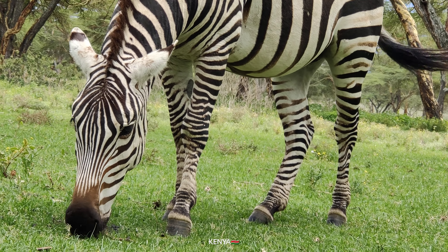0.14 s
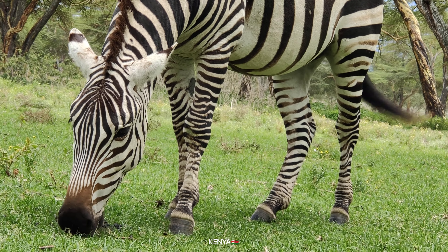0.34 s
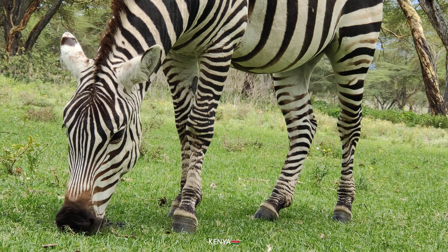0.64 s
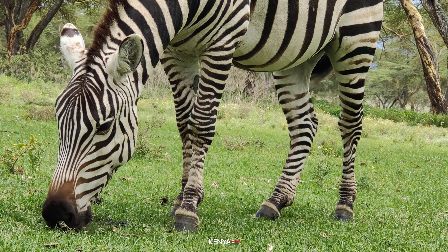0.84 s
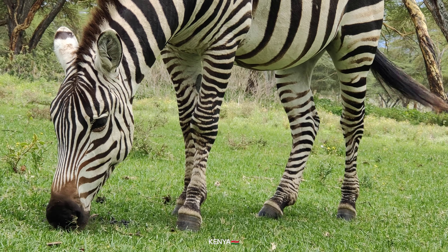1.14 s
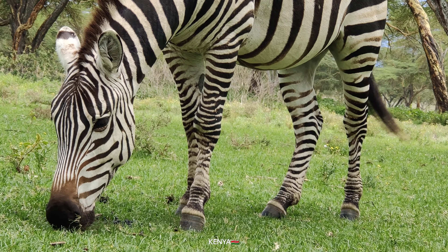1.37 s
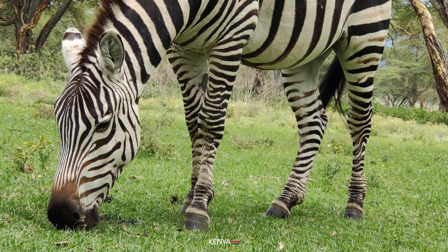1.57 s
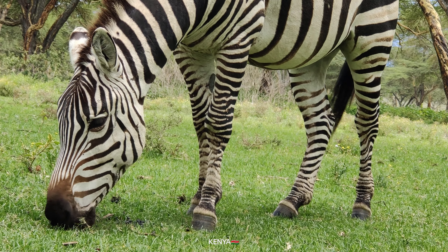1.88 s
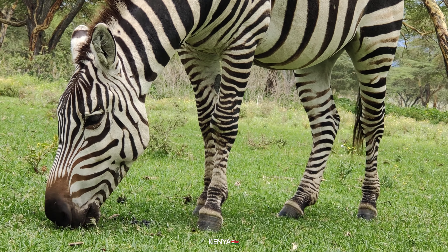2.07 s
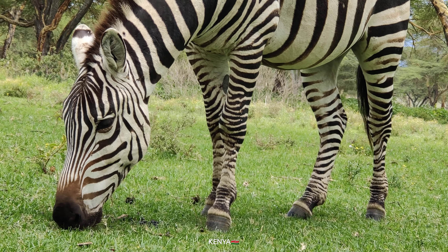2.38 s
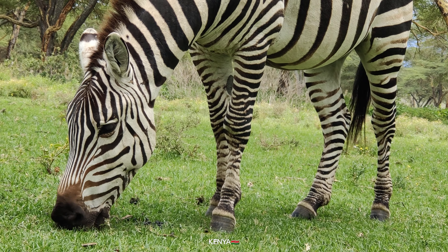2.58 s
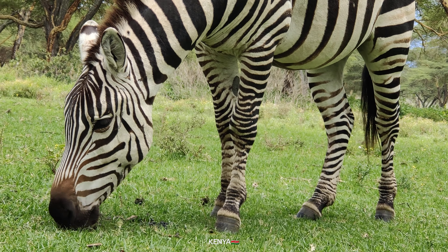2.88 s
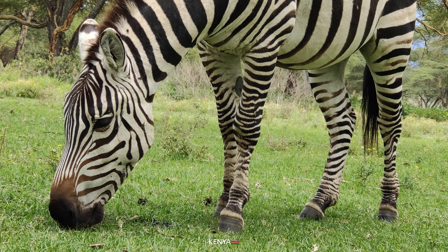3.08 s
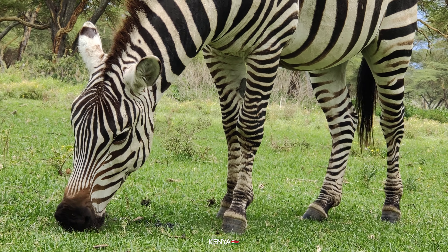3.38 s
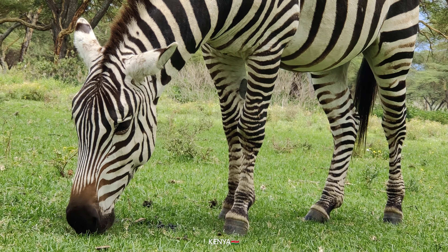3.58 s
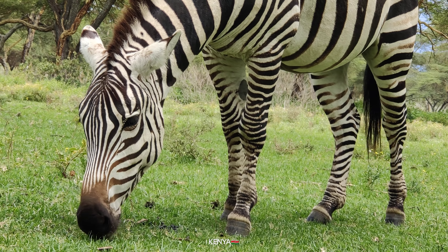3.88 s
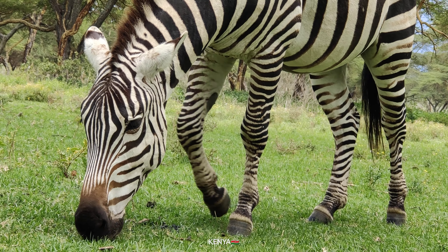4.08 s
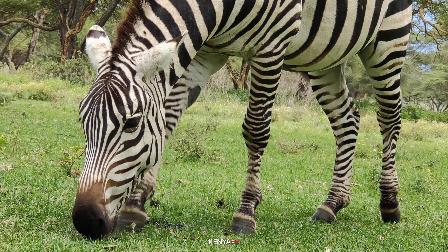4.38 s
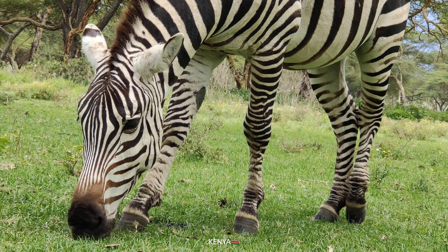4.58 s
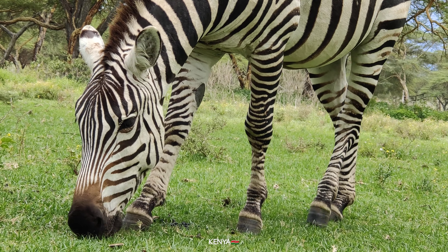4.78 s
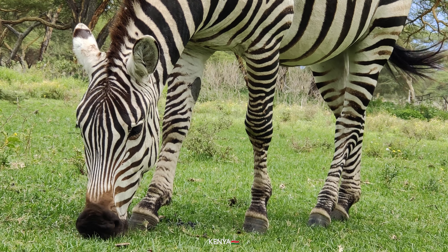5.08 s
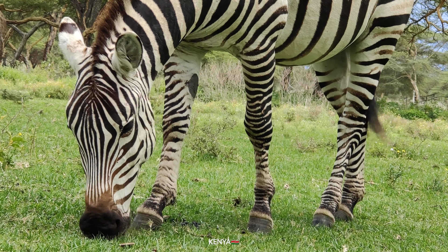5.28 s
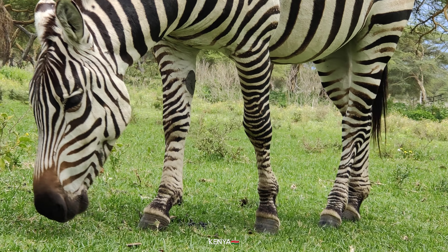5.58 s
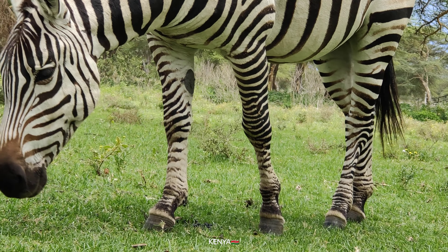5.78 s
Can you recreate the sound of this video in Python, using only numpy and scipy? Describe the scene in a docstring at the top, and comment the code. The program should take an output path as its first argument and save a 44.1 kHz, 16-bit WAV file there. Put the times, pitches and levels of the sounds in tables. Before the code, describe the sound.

Open grassland, heard in stereo from a few metres away, with a soft distant low rumble and faint smooth hiss throughout. During the first 1.3 seconds a light breeze buffets the left side in slow uneven puffs, while a low bird coos and small birds give thin, quick gliding whistles, fairly busy until about 1.7 seconds. A grazing zebra makes a short crackling snap with a turf thump at 0.8. Quiet hollow jaw knocks come at 1.3, 1.9 and 2.4, with a soft dull thud at 2.0. A deeper thud at 2.8 leads into a strong, sharp tearing burst at 2.9, crisp and scraping, with a low thump. A smaller snap follows at 3.5, then faint knocks and ticks around 4.1 to 4.5 amid scattered chirps. At about 5.4 comes the loudest rip, a dense crackle with a hard snap and thump, then calm with a few faint chirps.

```python
"""A zebra crops short grass a few metres away: pulls crackle, stalks snap and the turf thumps.
Snaps and knocks are short pushes or ticks that ring the mouth; thuds are low tones that die away.
Small birds whistle (gliding sine tones) and a low call coos, over a distant rumble and faint hiss (shaped noise).
At first a light breeze buffets mainly the left microphone port with slow, uneven pressure swings."""
import sys
import numpy as np
from scipy import signal
from scipy.fft import rfft, irfft
from scipy.io import wavfile

SR = 44100
rng = np.random.default_rng(int(sys.argv[2]) if len(sys.argv) > 2 else 0)


def put_to_file(sound):
    """Save the sound as 16-bit audio at rate SR, in the file named by the first command-line argument."""
    columns = np.atleast_2d(sound).T  # one column per channel
    safe = np.clip(columns, -1, 1)
    whole_steps = np.round(safe * 32767)
    wavfile.write(sys.argv[1], SR, whole_steps.astype(np.int16))


N = 261811


def undb(db):
    """Turn decibels into a gain."""
    return 10 ** (np.asarray(db) / 20)


def unit(x):
    """Scale a sound to rms 1."""
    return x / np.sqrt(np.mean(x ** 2) + 1e-20)


def clock(seconds):
    """Sample times of a short sound, in seconds."""
    return np.arange(max(int(seconds * SR), 8)) / SR


def add(track, start_s, sound):
    """Mix a sound into a track, dropping whatever falls outside it."""
    at = np.arange(len(sound)) + int(start_s * SR)
    inside = (at >= 0) & (at < N)
    track[at[inside]] += sound[inside]


def band(x, lo_hz, hi_hz, order=2):
    """Keep only the frequencies between two edges."""
    edges = [lo_hz, min(hi_hz, .45 * SR)]
    return signal.sosfilt(signal.butter(order, edges, "band", fs=SR, output="sos"), x)


def walk(rate):
    """Slow random drift with a spread near 1, with this many new values a second."""
    knots = rng.standard_normal(int(N / SR * rate) + 2)
    return np.interp(np.arange(N) / SR * rate, np.arange(len(knots)), knots)


def ring(modes, detune=1, phase=0):
    """One blow sets off several tones, each falling by 60 dB in its own time t60."""
    t = clock(.2)
    sound = np.zeros(len(t))
    for hz, t60, db in modes:
        decay = np.exp(-np.log(1000) * t / t60)
        sound += undb(db) * np.sin(2 * np.pi * hz * detune * t + phase) * decay
    return sound


def ports(x, lag_ms, pan_db=0):
    """Two microphone ports: a positive lag reaches the right one later, a positive pan favours the left."""
    late = np.interp(np.arange(N) - lag_ms * SR / 1000, np.arange(N), x, left=0)
    return np.array([x * undb(pan_db / 2), late * undb(-pan_db / 2)])


def scatter(x, t60, damp_hz):
    """Diffuse return from ground and bushes: a fading noise tail, different at each port."""
    t = clock(.6)
    noise = band(rng.standard_normal((2, len(t))), 210, damp_hz, order=1)
    tails = noise * np.exp(-np.log(1000) * t / t60)
    return np.array([signal.fftconvolve(x, tail / np.linalg.norm(tail))[:N] for tail in tails])


def air(level_db=-52.8, rumble_pan_db=2):
    """Open-air background: distant rumble, much alike at both ports, under a smooth faint hiss."""
    # noise spectrum: f/Hz, relative level/dB (per Hz)
    air_spectrum = [(12, -33), (20, -7), (33, -4.5), (49, -1.5), (76, -1.5), (169, -15), (387, -29),
                    (796, -33.5), (889, -36), (1510, -38.5), (1830, -41.5), (3270, -41.5), (3550, -43.5),
                    (6180, -47.5), (12000, -47.5), (15000, -49)]
    # how alike the two ports are: f/Hz, likeness (0 unrelated, 1 the same)
    port_likeness = [(60, 0.7), (130, 0.6), (290, 0.22), (640, 0.22), (1400, 0.37), (15000, 0.0062)]
    log_hz = np.log(np.maximum(np.arange(N // 2 + 1) * SR / N, 1))
    spectrum_hz, spectrum_db = np.transpose(air_spectrum)
    likeness_hz, likeness = np.transpose(port_likeness)
    gain = undb(np.interp(log_hz, np.log(spectrum_hz), spectrum_db))
    alike = np.clip(np.interp(log_hz, np.log(likeness_hz), likeness), 0, 1)
    # nothing below 15 Hz
    mid, side = rfft(rng.standard_normal((2, N))) * gain * (log_hz > np.log(15))
    left_right = np.array([[1], [-1]])
    both = np.sqrt(1 + alike) * mid + np.sqrt(1 - alike) * side * left_right
    # only the lows waver; the hiss stays even
    low = 1 / (1 + (np.exp(log_hz) / 700) ** 2)
    waver_db = .3 * walk(1.5) + 1.1 * walk(12)
    rumble = irfft(both * low, N) * undb(waver_db + left_right * rumble_pan_db / 2)
    hiss = irfft(both * (1 - low), N)
    return undb(level_db) * unit(rumble + hiss)


def whistle(length, pitches, depth_hz=0, trill_hz=85, waver=0.006, flutter_db=1.6, swell=.65, unsteady=.3):
    """A nearly pure note swells and fades as its pitch curves, perhaps with an uneven trill."""
    t = clock(length)
    u = t / length
    # a smooth curve through the start, middle and end pitches
    curve = np.polyfit([0, .5, 1], np.log(pitches), 2)
    hz = np.exp(np.polyval(curve, u))
    trill_rate = trill_hz * np.exp(unsteady * walk(60)[:len(t)])
    trill = np.sin(2 * np.pi * np.cumsum(trill_rate) / SR)
    hz = hz * (1 + waver * walk(171)[:len(t)]) + depth_hz * trill
    loudness = np.sin(np.pi * u) ** swell * undb(flutter_db * walk(53)[:len(t)])
    return np.sqrt(2) * loudness * np.sin(2 * np.pi * np.cumsum(hz) / SR)


def birds():
    """Smooth low coos, and thin slurs and trills above them, each a gliding near-pure tone."""
    # a low cooing call: t/s, length/s, start f/Hz, middle f/Hz, end f/Hz, level/dB
    coos = [(-0.09, 0.24, 1210, 1248, 1150, -61), (0.135, 0.06, 1190, 1210, 1200, -79),
            (0.475, 0.165, 1110, 1220, 1000, -67), (0.6, 0.08, 1370, 1335, 1280, -76.5),
            (0.95, 0.15, 1075, 1115, 1095, -76)]
    # songbirds: t/s, length/s, start f/Hz, middle f/Hz, end f/Hz, trill depth/Hz, level/dB
    slurs = [(0.103, 0.035, 5350, 4720, 3800, 0, -72), (0.107, 0.18, 7570, 7270, 6750, -3, -77.5),
             (0.17, 0.044, 2200, 2410, 2650, 150, -78), (0.24, 0.019, 2100, 2390, 2750, -2, -75),
             (0.335, 0.15, 4300, 3350, 2600, 230, -76.5), (0.455, .11, 2650, 2170, 2750, 172, -77),
             (0.547, 0.07, 2810, 3340, 2440, 2, -76), (0.612, 0.052, 5200, 3300, 2400, 0, -71.5),
             (1.076, .11, 2480, 2540, 2680, 44, -78.5), (1.171, .13, 2650, 3170, 4110, 150, -79.5),
             (1.27, 0.05, 3700, 4050, 4150, 160, -75), (1.315, 0.028, 4150, 3450, 2500, 0, -75.5),
             (1.346, 0.041, 2750, 3530, 4180, 0, -75), (1.378, 0.04, 4060, 2900, 3360, 0, -75.5),
             (1.382, 0.034, 4300, 4400, 4700, 0, -80), (1.413, 0.064, 2800, 2660, 2100, 0, -67),
             (1.578, 0.1, 3200, 3220, 3200, 50, -80), (1.625, 0.034, 4430, 5260, 5550, 0, -74),
             (1.659, 0.062, 5600, 4800, 3500, 0, -70.5), (1.712, 0.045, 3700, 2850, 2450, 0, -79),
             (1.947, 0.085, 4100, 3600, 3240, 60, -80), (2.175, 0.18, 3200, 3207, 3300, 110, -81),
             (2.45, 0.069, 5200, 4100, 3220, 0, -80), (2.617, 0.057, 3130, 2880, 2500, 2, -77.5),
             (3.075, 0.05, 3850, 4000, 3500, 0, -79), (3.506, 0.06, 5400, 4250, 3150, 40, -75),
             (3.575, 0.05, 3050, 3200, 3300, 40, -80), (3.85, 0.049, 3740, 3080, 2600, 0, -80),
             (3.971, 0.032, 2580, 3000, 3250, 0, -80), (4.009, 0.024, 3300, 2940, 2500, 0, -75),
             (4.055, 0.031, 3100, 3700, 3500, 248, -73.5), (4.05, .06, 4100, 4350, 4150, 300, -82),
             (4.067, .02, 3270, 2850, 2550, 0, -76), (4.223, 0.024, 2500, 2910, 3400, 0, -77),
             (4.27, 0.023, 4220, 4100, 3970, 0, -80), (4.28, 0.022, 3160, 3250, 2930, 0, -74.5),
             (4.692, .04, 3700, 3180, 2600, 0, -81), (4.714, 0.067, 2900, 2430, 2330, 0, -70.5),
             (4.766, 0.055, 2330, 2240, 1950, 0, -72.5), (4.762, 0.026, 4960, 5200, 4750, 200, -75.5),
             (4.763, 0.045, 4730, 4280, 4100, 100, -78), (4.826, .085, 3700, 3750, 4000, 140, -82),
             (4.903, 0.023, 2970, 3130, 3270, 0, -77), (4.997, 0.042, 2830, 2720, 2530, -2, -73.5),
             (4.934, .05, 3114, 3240, 3180, 120, -75), (5.725, 0.075, 3700, 3350, 2600, 120, -76),
             (5.85, 0.035, 4000, 4250, 4400, 0, -80), (5.905, 0.05, 5950, 5800, 5650, 0, -77)]
    out = np.zeros(N)
    for s, length, *pitches, db in coos:
        add(out, s, undb(db) * whistle(length, pitches, flutter_db=1.8, swell=1.7))
    for s, length, *pitches, depth_hz, db in slurs:
        add(out, s, undb(db) * whistle(length, pitches, depth_hz))
    return out


def breeze(wobble=0.05, rush_db=-17):
    """Eddies roll over a port, each a few uneven slow pressure swings with a little rush."""
    # gusts: t/s, length/s, swirl f/Hz (before its wobble), level/dB (before panning)
    gusts = [(-0.02, 0.17, 35, -39), (0.281, 0.077, 32, -45), (0.642, 0.051, 46.7, -44.5),
             (0.788, 0.052, 40.4, -47), (0.988, 0.093, 33, -42.5), (1.08, 0.067, 56, -35.5),
             (1.203, 0.092, 46.5, -40.5)]
    out = np.zeros(N)
    drift = walk(66.1)
    rush = unit(band(rng.standard_normal(N), 66.0, 103.0))
    for s, length, hz, db in gusts:
        t = clock(length)
        start = int(s * SR)
        swirl_hz = hz * np.exp(wobble * np.roll(drift, -start)[:len(t)])
        swirl = np.sin(2 * np.pi * np.cumsum(swirl_hz) / SR)
        eddy = swirl + undb(rush_db) * np.roll(rush, -start)[:len(t)]
        add(out, s, undb(db) * np.sin(np.pi * t / length) * eddy)
    return out


def ticks(length, fibres_per_s=1400, size_db=3.5):
    """A short swell of quick ticks at random moments and of uneven size, with rms 1."""
    t = clock(length)
    chance = rng.random((2, len(t)))
    happens = chance[0] < fibres_per_s / SR
    sizes = undb(-size_db * np.log(chance[1] + 1e-3))
    # push up on even samples, down on odd ones
    signs = (-1) ** np.arange(len(t))
    return unit(happens * sizes * signs * np.sin(np.pi * t / length) ** .5)


def chews(spread=.03):
    """Teeth grind briefly and ring the closed mouth, whose shape differs a little at each stroke."""
    # hollow knocks of the jaws: t/s, grind length/s, peak level/dB
    jaw_knocks = [(0.107, 0.08, -54), (1.284, 0.062, -48.5), (1.933, 0.02, -52), (2.41, 0.047, -46.5),
                  (4.08, 0.044, -54.5)]
    # tones of the closed mouth: f/Hz (before its random shift), t60/s, relative level/dB
    jaw_modes = [(330, 0.08, 5), (420, 0.02, 1), (630, 0.018, -6), (968, 0.03, -3)]
    out = np.zeros(N)
    for s, length, db in jaw_knocks:
        t = clock(length)
        grind = ticks(length) * np.sin(np.pi * t / length)
        mouth = ring(jaw_modes, detune=np.exp(spread * rng.standard_normal()))
        knock = signal.fftconvolve(grind, mouth)
        add(out, s, undb(db) * knock / np.abs(knock).max())
    return out


def crack(low_hz, spread=0.025, release_ms=1.12, release_power=0.3):
    """A sudden release of tension, heard directly and through a slightly varying mouth; peak 1."""
    # tones of mouth and sod: f/Hz (before its random shift), t60/s, level/dB (against the bare crack)
    mouth_modes = [(393, 0.035, -40), (470, 0.018, -39), (657, 0.04, -45), (727, 0.05, -52),
                   (1060, 0.02, -50), (1207, 0.019, -46), (1459, 0.04, -41), (1700, 0.012, -37)]
    shifts = np.exp(spread * rng.standard_normal(len(mouth_modes)))
    modes = [(hz * shift, t60, db) for (hz, t60, db), shift in zip(mouth_modes, shifts)]
    mouth = ring(modes, phase=np.pi / 2)
    # release_ms holds for a low edge of 200 Hz; thinner stalks, with higher edges, let go faster
    release_s = release_ms / 1000 * (low_hz / 200) ** -release_power
    t = np.arange(len(mouth)) / SR
    push = np.sin(np.pi * np.minimum(t / release_s, 1)) ** 2
    through_mouth = signal.fftconvolve(push, mouth)[:len(mouth)]
    sound = band(push + through_mouth, low_hz, 6000, order=1)
    return sound / np.abs(sound).max()


def blades(count):
    """Short ring of a dry blade parting, with unit energy, in this many samples."""
    # crisp tones of breaking blades: f/Hz, t60/s, relative level/dB
    blade_modes = [(2770, 0.0047, 4), (3480, 0.0027, -6), (5660, 0.0026, 5), (8000, 0.00072, 11.5)]
    tick = band(ring(blade_modes), 2400, 8500, order=4)[:count]
    return tick / np.linalg.norm(tick)


def snap(snap_db, turf_db, low_hz, turf_hz=141, turf_t60=0.073, turf_rise=0.006, crisp_db=-21,
         splinter_s=0.0045):
    """Grass lets go: a crack rings the mouth, fibres splinter, and the released turf springs back."""
    t = clock(.2)
    # cubing the noise leaves a few strong spikes
    fibres = rng.standard_normal(len(t)) ** 3 * np.exp(-t / splinter_s)
    splinters = np.convolve(fibres, blades(count=512))[:len(t)]
    sound = crack(low_hz) + undb(crisp_db) * splinters / np.abs(splinters).max()
    turf = ring([(turf_hz, turf_t60, turf_db)], phase=np.pi / 4)
    turf = turf * (1 - np.exp(-t / turf_rise))
    return -undb(snap_db) * sound - turf


def snaps():
    """Stalks and tufts break one after another, mostly in clusters around the pulls."""
    # t/s, crack level/dB, turf thump level/dB (before its rise and decay), low edge f/Hz of the crack;
    # thin stalks crack in a higher band
    bites = [(0.7995, -57, -62, 400), (0.811, -48, -40, 160), (0.8235, -51, -52, 450),
             (0.828, -53, -36, 400), (0.8297, -46.5, -47, 397), (0.835, -49, -30.5, 500),
             (0.8367, -50, -50, 700), (0.8434, -38, -26, 150), (1.93, -63, -59, 826),
             (2.224, -55, -48.5, 400), (2.8874, -40, -46, 600), (2.8905, -40, -48, 600),
             (2.8926, -38, -49, 820), (2.895, -35.5, -33, 220), (2.8993, -50, -52, 710),
             (2.9061, -31, -26.5, 410), (2.9122, -28.5, -19, 170), (2.9645, -55.5, -56, 600),
             (3.5115, -39.5, -36, 760), (3.5119, -45, -52, 764), (3.5157, -48, -28.5, 800),
             (3.5471, -53.5, -40.5, 800), (4.536, -57, -67, 1100), (5.36, -38.5, -50, 795),
             (5.3632, -48, -41, 500), (5.3685, -50, -32, 800), (5.369, -41, -40, 700),
             (5.3753, -37, -44, 350), (5.3785, -47, -36, 600), (5.3858, -26, -18, 295),
             (5.3901, -43, -45, 250), (5.401, -39, -39, 300), (5.4451, -46.5, -72, 463)]
    out = np.zeros(N)
    for s, snap_db, turf_db, low_hz in bites:
        add(out, s, snap(snap_db, turf_db, low_hz))
    return out


def pulls(low_hz=600, crisp_db=-15):
    """Single blades part throughout each pull: a dull part through the lips and a crisp part in the open."""
    # pulls on the grass: t/s, length/s, crackle level/dB, brightness/dB (added to crisp_db)
    grass_pulls = [(0.817, 0.035, -61.5, -1), (1.923, 0.024, -63.5, -8), (2.223, 0.0052, -69, 17.5),
                   (2.884, 0.045, -54, -14), (3.506, 0.046, -66, -1), (4.528, 0.021, -77.5, 11.5),
                   (5.353, 0.057, -54.5, -3)]
    out = np.zeros(N)
    mouth = crack(low_hz)
    mouth = mouth / np.linalg.norm(mouth)
    crisp = blades(count=len(mouth))
    for s, length, db, bright_db in grass_pulls:
        parting = mouth + undb(crisp_db + bright_db) * crisp
        add(out, s, undb(db) * signal.fftconvolve(ticks(length), parting))
    return out


def thuds(contact_s=0.0095):
    """Soft contacts push the turf, which rings low and dies away."""
    # dull thuds of muzzle and hooves: t/s, f/Hz, t60/s, peak level/dB
    turf_thuds = [(1.778, 169, 0.052, -47.5), (2.045, 109.5, 0.033, -35), (2.76, 308, 0.012, -41.5),
                  (2.766, 114, 0.041, -41.5), (2.78, 75.5, 0.11, -31), (2.822, 136.4, 0.33, -46.5),
                  (3.515, 185, 0.14, -46.5), (4.318, 196, 0.13, -58.5)]
    out = np.zeros(N)
    for s, hz, t60, db in turf_thuds:
        thud = ring([(hz, t60, 0)])
        t = np.arange(len(thud)) / SR
        # a soft contact builds up gradually
        thud = thud * (1 - np.exp(-(t / contact_s) ** 2))
        add(out, s, -undb(db) * thud / np.abs(thud).max())
    return out


def scrapes(blade_t60=.0035, slips_per_s=2500, size_db=4):
    """A blade sliding through the lips sticks and slips in dense uneven ticks that ring it at one pitch."""
    # blades scraping and springing back: t/s, length/s, f/Hz, level/dB
    blade_scrapes = [(2.888, 0.04, 3200, -73), (2.915, 0.015, 5400, -75), (2.931, 0.014, 5650, -68),
                     (2.93, 0.04, 3350, -76), (5.35, 0.024, 4850, -73), (5.383, 0.01, 5900, -67),
                     (5.38, 0.035, 2850, -68)]
    out = np.zeros(N)
    for s, length, hz, db in blade_scrapes:
        blade = band(ring([(hz, blade_t60, 0)]), hz * .8, hz * 1.2)
        blade = blade / np.linalg.norm(blade)
        slips = ticks(length, slips_per_s, size_db)
        add(out, s, undb(db) * signal.fftconvolve(slips, blade))
    return out


def scene():
    """The zebra just left of centre, its treble spread by the ground; birds further off, breeze and air."""
    zebra = snaps() + pulls() + scrapes() + chews() + thuds()
    song = birds()
    near = ports(zebra, lag_ms=.05) + undb(-18) * scatter(zebra, t60=.08, damp_hz=6000)
    # gains for left and right
    treble = undb([[-5], [-3]]) * scatter(band(zebra, 2400, 12000), t60=.012, damp_hz=9000)
    far = ports(song, lag_ms=-0.04, pan_db=-0.5) + undb(-7) * scatter(song, t60=.22, damp_hz=7100)
    wind = ports(breeze(), lag_ms=.3, pan_db=23)
    return near + treble + far + wind + air()


def record(dry, top_hz=15200):
    """The microphone colours the treble and the recorder cuts the top."""
    # microphone colour: f/Hz, gain/dB; the end values carry on beyond the ends
    mic_colour = [(2500, 3), (3200, 4.5), (4300, 5), (5600, 5), (6400, 0), (9500, 1), (12000, 1.5)]
    hz, db = np.transpose(mic_colour)
    colour = undb(np.interp(np.arange(N // 2 + 1) * SR / N, hz, db))
    coloured = irfft(rfft(dry) * colour, N)
    return signal.sosfilt(signal.ellip(8, .2, 70, top_hz, fs=SR, output="sos"), coloured)


dry = scene()
out = record(dry)
put_to_file(out)
```